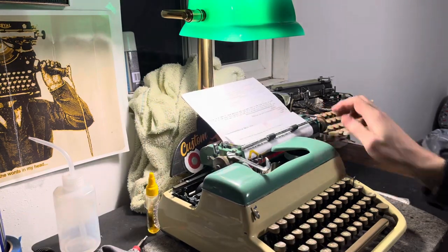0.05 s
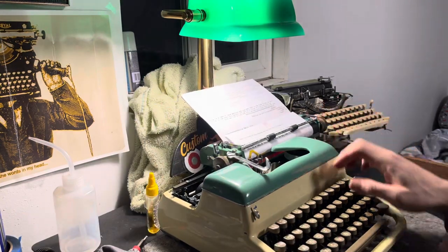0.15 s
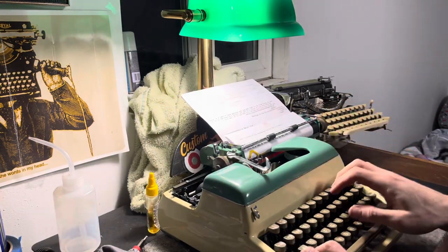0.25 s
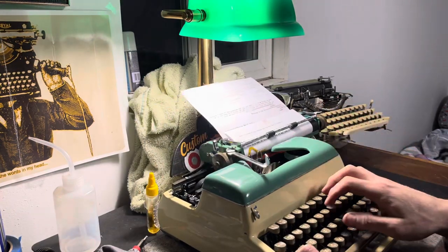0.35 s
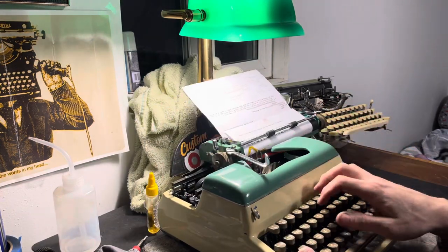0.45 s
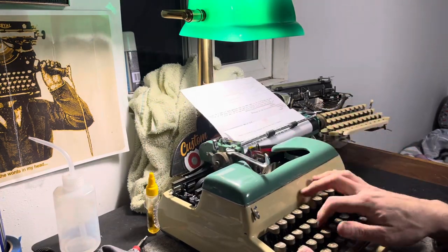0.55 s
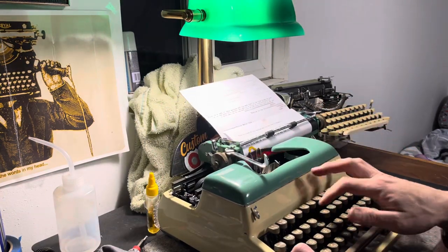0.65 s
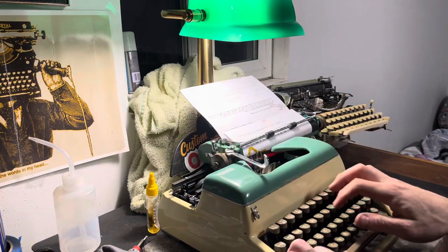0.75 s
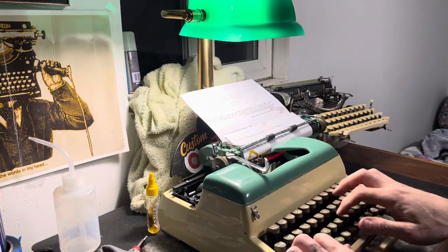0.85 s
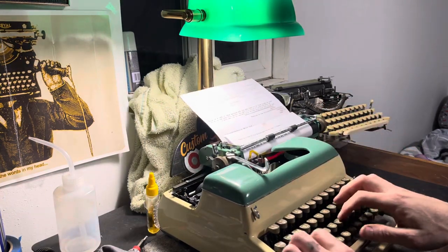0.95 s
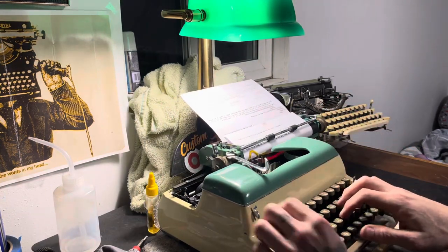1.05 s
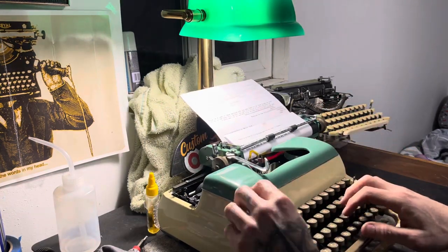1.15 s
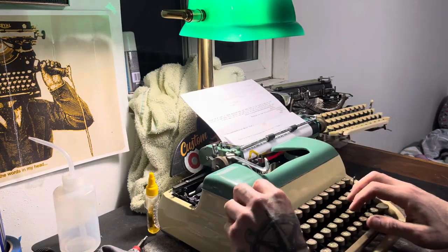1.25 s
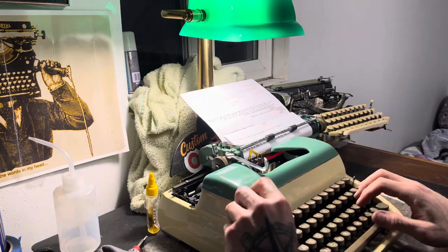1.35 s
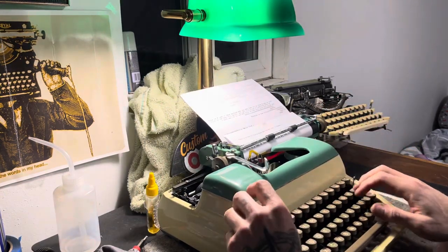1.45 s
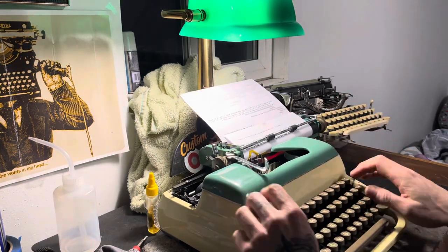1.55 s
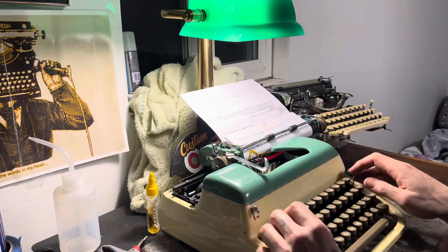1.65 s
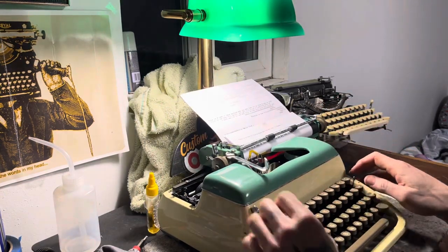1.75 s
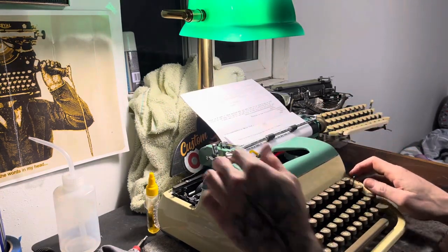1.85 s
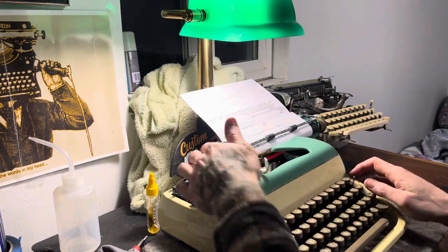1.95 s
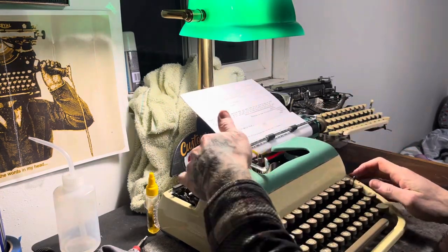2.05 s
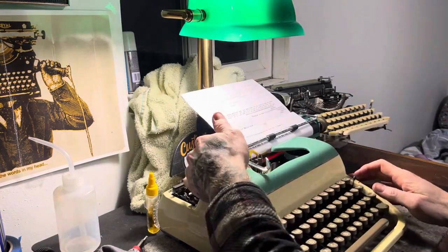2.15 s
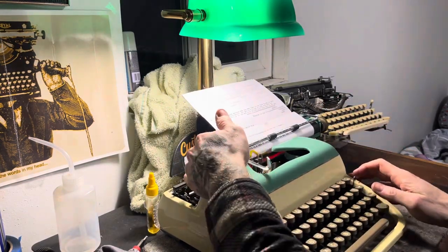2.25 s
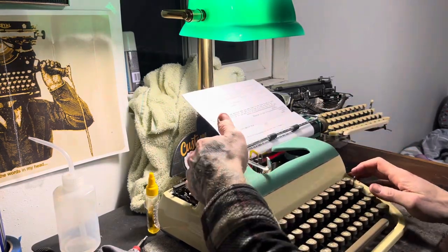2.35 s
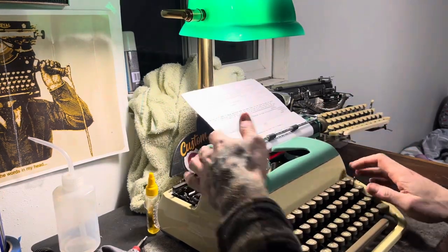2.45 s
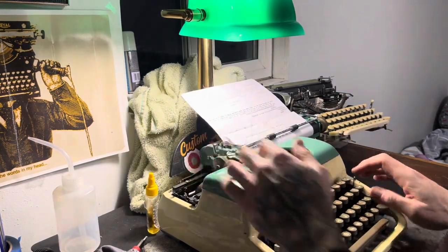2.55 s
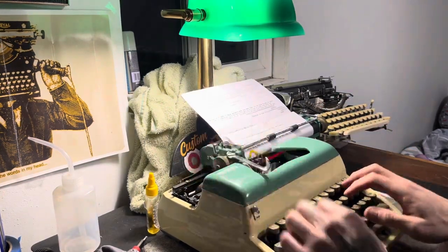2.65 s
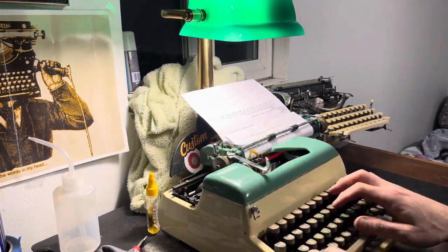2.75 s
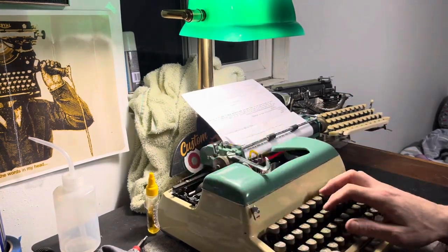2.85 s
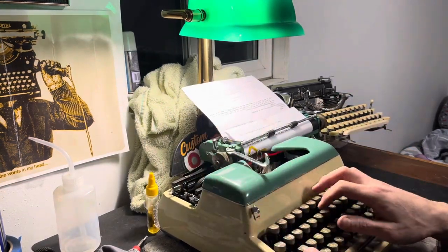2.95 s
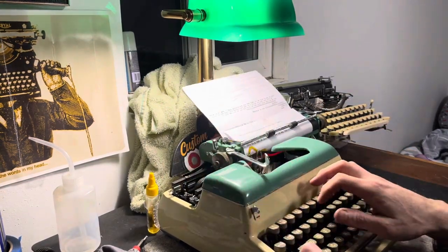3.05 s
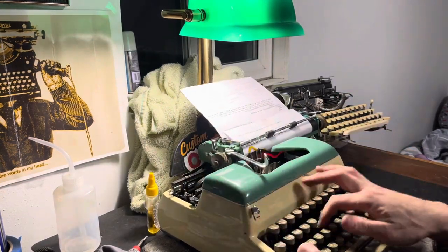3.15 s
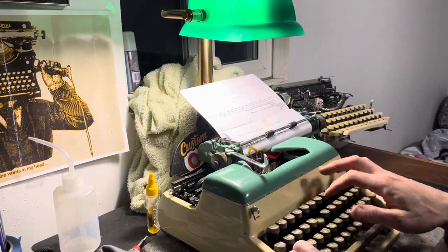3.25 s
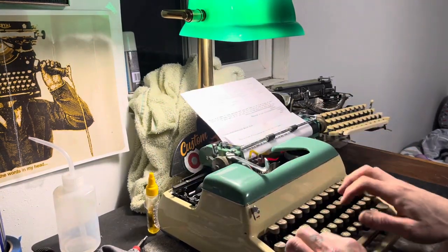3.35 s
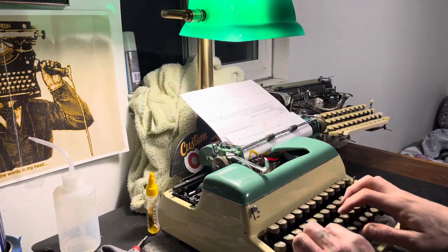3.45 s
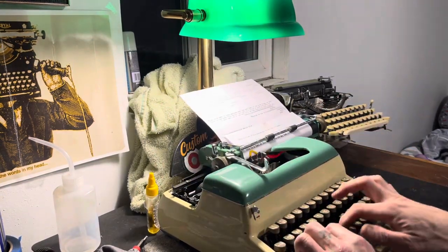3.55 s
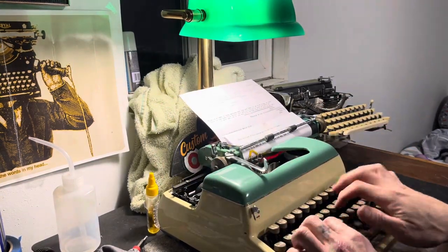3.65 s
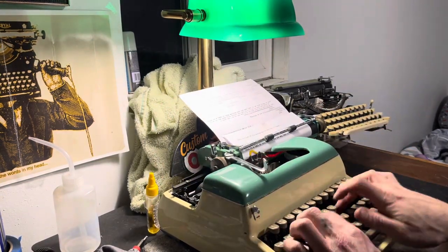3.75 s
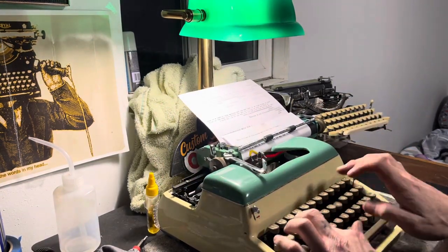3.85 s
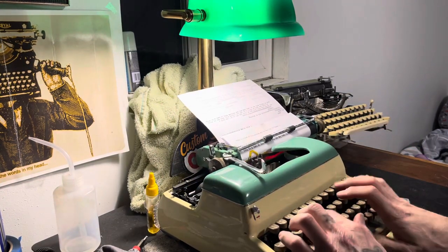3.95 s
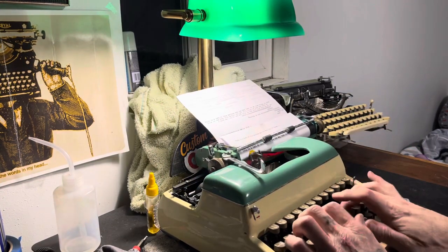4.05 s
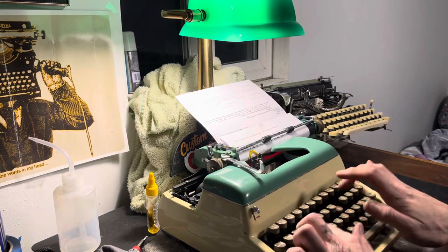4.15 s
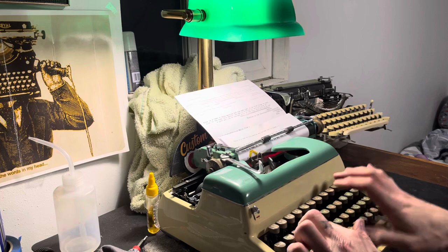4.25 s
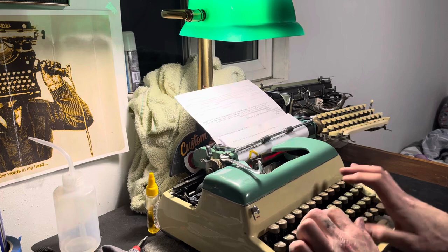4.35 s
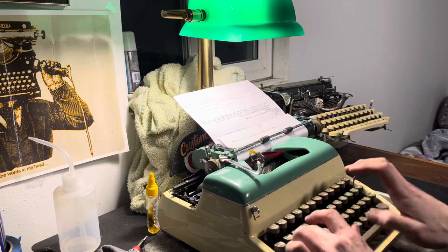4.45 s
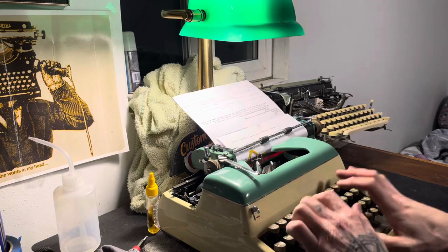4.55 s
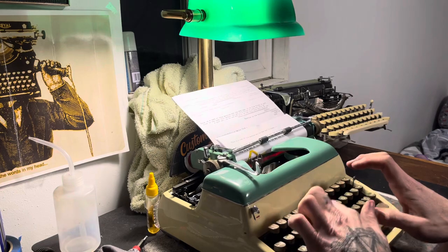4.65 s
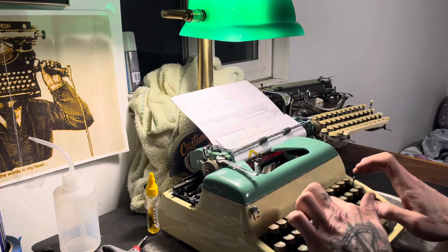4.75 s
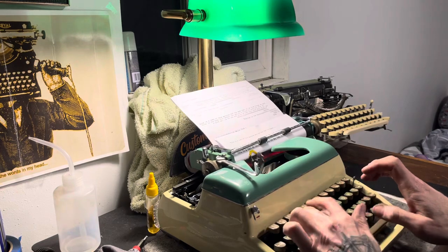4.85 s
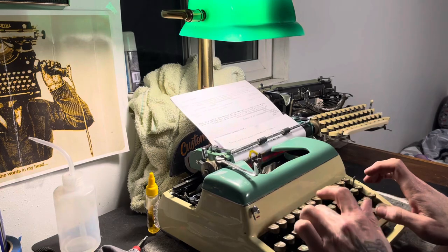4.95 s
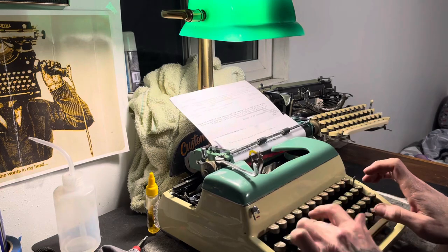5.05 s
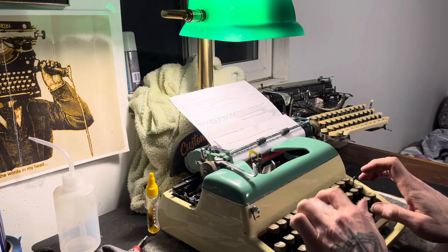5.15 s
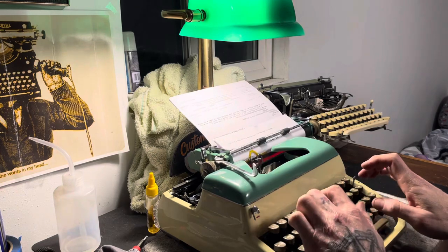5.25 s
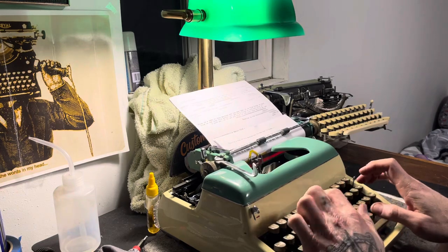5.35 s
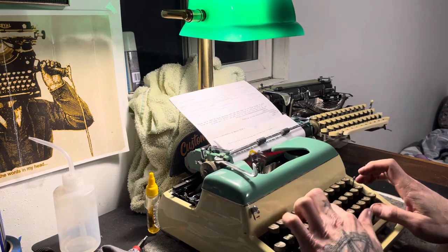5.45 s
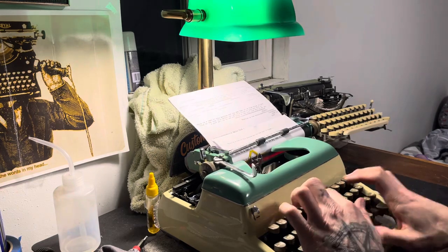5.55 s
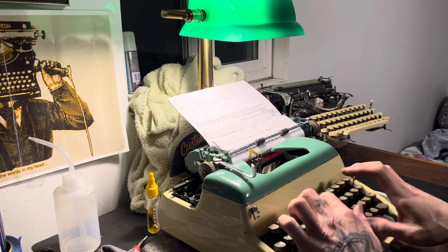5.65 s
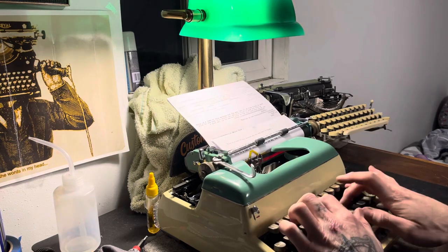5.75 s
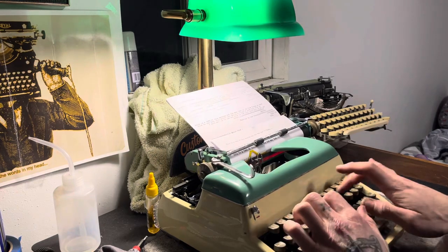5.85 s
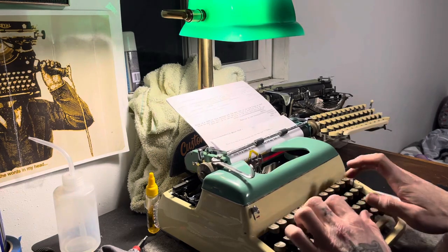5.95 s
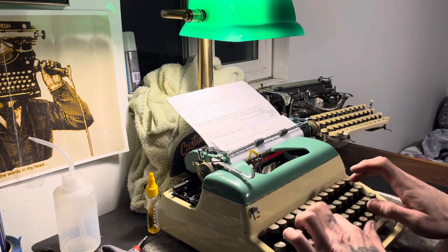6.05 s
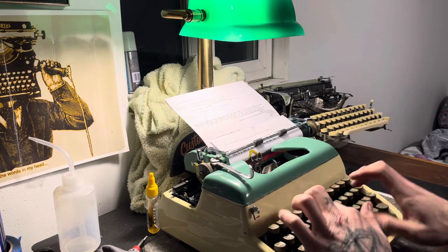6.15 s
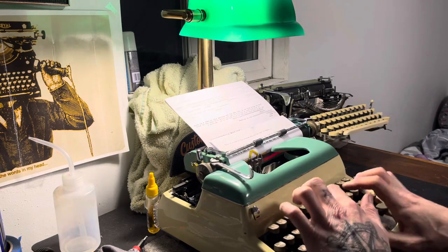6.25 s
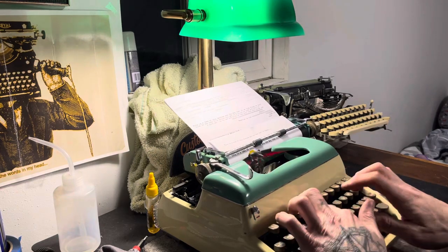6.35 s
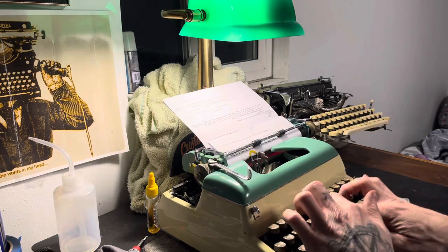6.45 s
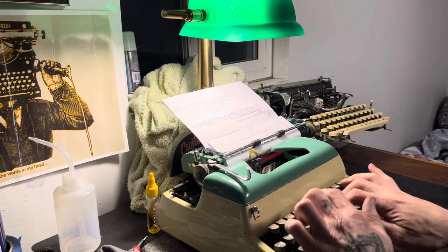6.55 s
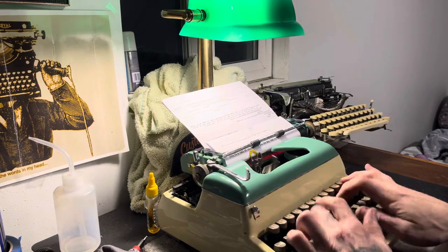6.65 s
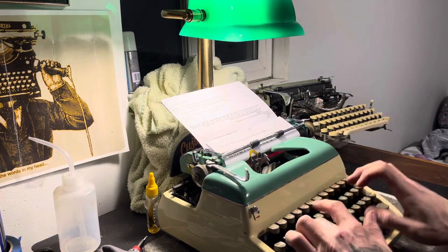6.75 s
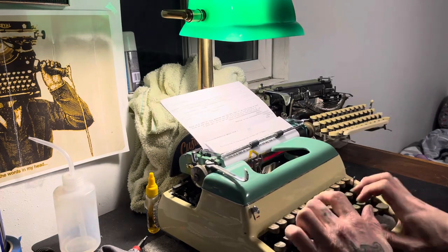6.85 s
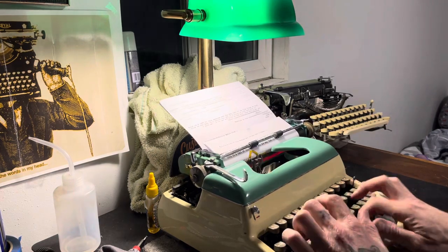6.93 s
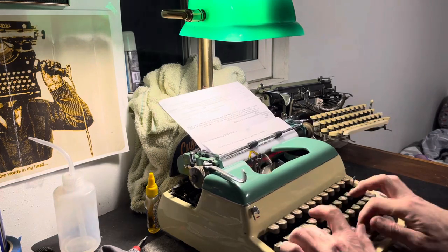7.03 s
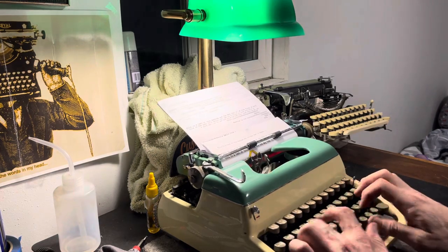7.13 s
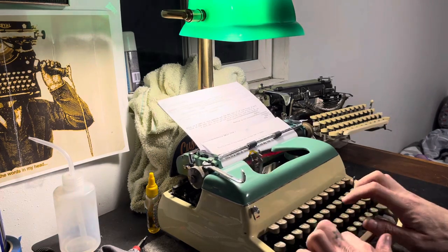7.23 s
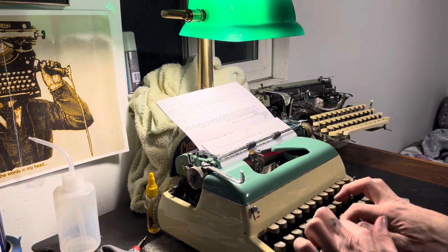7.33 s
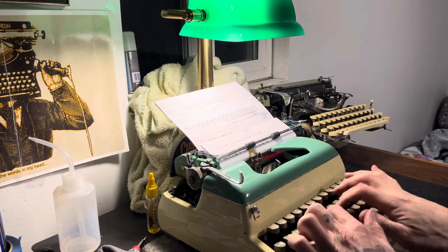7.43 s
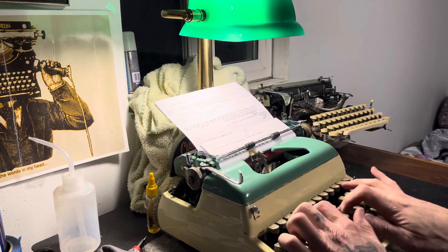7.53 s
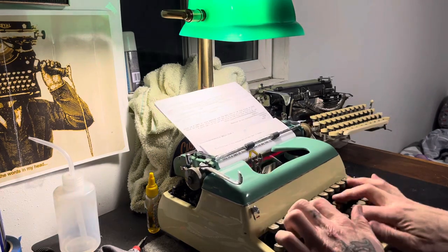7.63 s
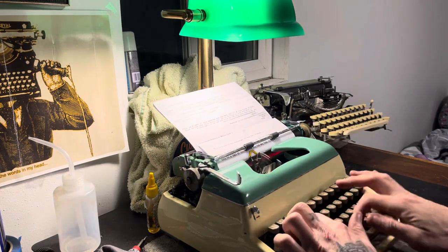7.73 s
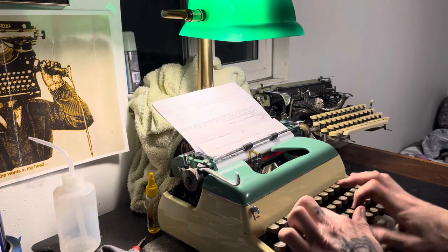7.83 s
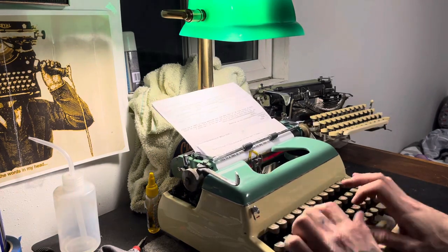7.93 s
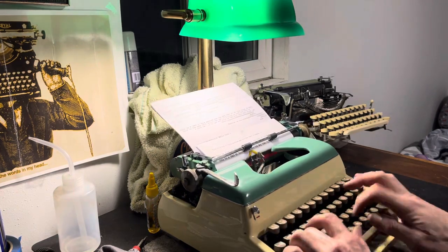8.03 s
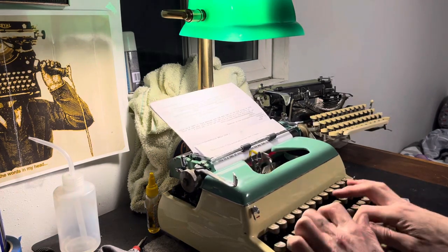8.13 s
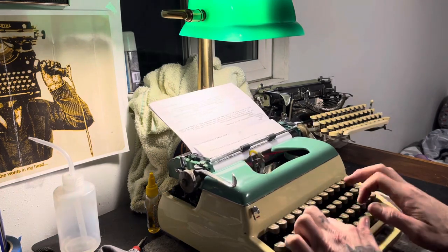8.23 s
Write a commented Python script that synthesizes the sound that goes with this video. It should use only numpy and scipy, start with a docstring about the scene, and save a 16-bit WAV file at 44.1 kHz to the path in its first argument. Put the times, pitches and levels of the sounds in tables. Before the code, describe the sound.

A manual typewriter heard close up: a few isolated hard key cracks with heavy shift clunks, a quiet carriage slide, then rapid continuous clattering typing.

```python
"""A manual typewriter on a wooden desk in a quiet room, heard close by on two channels.
Type slugs crack on the platen and ring it in bursts of noise and damped sines; each key drives
a rattling steel linkage of gritty scrapes and ticks, and shifting drops the heavy basket.
The case knocks and the desk booms in decaying low modes; once the carriage slides back, rustling.
Short noise tails reflect it all, over a faint room rumble of coloured noise."""
import sys
import numpy as np
from scipy import signal
from scipy.fft import rfft, irfft, next_fast_len
from scipy.io import wavfile
from scipy.ndimage import map_coordinates

SR = 44100
rng = np.random.default_rng(int(sys.argv[2]) if len(sys.argv) > 2 else 0)


def boost_factor(decibels):
    """Convert a level in decibels to a linear amplitude factor."""
    exponent = np.asarray(decibels, float) / 20
    return 10 ** exponent


def wav_record(signal):
    """Record a signal, one row per channel, as 16-bit PCM in the file named by sys.argv[1]."""
    frames = np.transpose(np.atleast_2d(signal))
    bounded = np.clip(frames, -1, 1)
    # unit amplitude maps onto the largest positive 16-bit level
    quanta = np.round(bounded * 32767).astype(np.int16)
    wavfile.write(sys.argv[1], SR, quanta)


N = 365588

# hard steel blows, type slugs on the platen (the second is a lever snapping):
# (time [s], level [dB], treble re blow [dB], slug ring [dB], lower ring [dB], case knock [dB])
STRIKES = [(0.569, -4.5, -12, -2, -8, -23), (1.3216, -14, -4, 0, 10, -28.5),
           (3.142, -6, -12.5, 1, -5, -20.5), (3.5474, -4, -19.5, 0, -3, -25), (3.727, -7.5, -4, -1, 0, -28),
           (3.835, -6.5, -14, 4.5, -8, -29.5), (4.0723, -11.5, -1, 0, 0, -28.5),
           (4.199, -10.5, -14.5, 1, 0, -25.5), (4.4475, -7.5, -10.5, 8.5, 4, -28.5),
           (4.709, -10, -1, -4.5, 2, -29.5), (4.8577, -6, -12, 7, 3, -27), (5.043, -7, -7, 3.5, 0, -33),
           (5.45, -10, -1, -6, -3, -30), (5.7818, -7, -17, -4, 0, -29.5), (6.0854, -8, 0.5, 8, -2, -27),
           (6.351, -9, -4, -3, -5, -30.5), (6.455, -5.5, -16, 0, 4, -27.5),
           (6.5966, -6.5, -14, 3, 2.5, -28), (6.707, -7, -12, 3, 2, -28),
           (7.001, -6.5, -14.5, -2.5, -1, -31.5), (7.0711, -9.5, -13.5, -6, -2, -35),
           (7.25, -8, -14, 2, -1.5, -32), (7.3535, -5, -16, -1, -4, -30),
           (7.5319, -11, -7.5, 9, 0.5, -30.5), (7.6714, -9, -15, 2, 0.5, -31),
           (7.768, -9, -17.5, 3, 0.5, -36), (8.023, -10.5, -9.5, 4, 0, -28.5),
           (8.1176, -8, -12.5, 1.5, -1, -27), (8.2416, -8.5, -16.5, -1, -0.5, -33.5)]
# broad colour of a slug on the platen: (frequency [Hz], relative density [dB per Hz])
CRACK = [(500, -19.5), (1300, -4), (2000, -3.5), (2900, 3), (4200, -5), (5200, -9.5), (6800, -7),
         (7500, -9.5), (17000, -57)]
# ring of the platen: (frequency [Hz], level [dB], 60 dB decay [s])
PLATEN = [(2090, -1.5, 0.015), (4050, -7.5, 0.0045), (4815, -8, 0.016), (6170, -2, 0.009),
          (7086, -0.5, 0.013), (11700, -10, 0.0065)]
# the colour of a blow drifts as the carriage moves along the platen:
# (time [s], slug ring [Hz], upper ring [dB], lower ring [dB])
CARRIAGE = [(0.5, 2535, -25, -19), (3.2, 2884, -25, -20), (4.7, 2815, -3.5, -32.5), (6.2, 2830, 0, -23),
            (6.7, 2750, -4.5, -8), (7.55, 2815, -47, -1), (7.67, 3030, -31, -5.5), (8.29, 2937, -33, 1)]
USUAL_TREBLE_DB, PLATEN_FOLLOWS, SLUG_FOLLOWS = -12.5, 0.36, -0.4  # bright: more platen, less slug
CRACK_T60_S, UPPER_SCATTER_DB = 0.02, -2
SLAP_S, SLAP_DB = 0.003, -7.5  # the slug touches twice
HANG_DB, HANG_T60_S = -21, 0.036  # and its ring hangs on faintly
SWELL_DB, SWELL_T60_S = -27, 0.069  # a faint noise swells just before each blow
UNEVEN_DB = 3.5


def strikes():
    """A crack of a few milliseconds; slug, platen and bars ring briefly near the same pitches each time."""
    s, db, treble_db, slug_db, low_db, _ = np.transpose(STRIKES)
    at, ring_hz, upper_db, lower_db = np.transpose(CARRIAGE)
    bright = treble_db - USUAL_TREBLE_DB

    touches = fades(s[:, None] + [0, SLAP_S], db[:, None] - 8.5 + [0, SLAP_DB], CRACK_T60_S, 0.00072)
    crack = touches * chatter(900, UNEVEN_DB) * noise(CRACK)
    hiss = fades(s, db + treble_db + 2.5, 0.02, 0.00089) * chatter(500, 2.1) * noise(SHEEN)

    hz, mode_db, fall = np.transpose(PLATEN)
    late, strength = rng.standard_normal((2, len(s), len(PLATEN)))
    platen_db = (db + PLATEN_FOLLOWS * bright)[:, None] - 12 + mode_db + 2.2 * strength
    platen = pings(s[:, None] + 0.0003 * abs(late), platen_db, hz, fall, 0.00021)

    upper_luck, lower_luck, slap_luck, hang_luck = rng.standard_normal((4, len(s)))
    slug_db = db - 6.5 + slug_db + SLUG_FOLLOWS * bright
    slug_hz = np.interp(s, at, ring_hz)
    slug = pings(s, slug_db, slug_hz, 0.01, 0.00049)
    slug += pings(s + SLAP_S, slug_db + SLAP_DB, slug_hz * (1 + 0.054 * slap_luck), 0.0096, 0.00087)
    hang = pings(s + SLAP_S, slug_db + HANG_DB, slug_hz * (1 + 0.02 * hang_luck), HANG_T60_S, 0.002)
    slug += hang * chatter(90, UNEVEN_DB)
    upper_db = db + np.interp(s, at, upper_db) + UPPER_SCATTER_DB * upper_luck
    slug += pings(s + 0.00041, upper_db, 4000, 0.0095, 0.0012)
    lower_db = db + np.interp(s, at, lower_db) + low_db + UPPER_SCATTER_DB * lower_luck
    slug += pings(s + 0.00029, lower_db, 1720, 0.0068, 0.00023)

    # bursts laid out backwards in time, so they grow up to the blow
    growing = fades(N / SR - s, db + SWELL_DB, SWELL_T60_S, 0.0004)[::-1]
    swell = growing * (noise(STEEL) + boost_factor(-16.5) * noise(SHEEN))
    return swell + crack + hiss + platen + slug + bars(s, db - 27.5, scatter_db=3.0)


# ring of type bars and platen: (frequency [Hz], level [dB], nominal 60 dB decay [s])
BARS = [(1847, -4.5, 0.16), (2092, 1, 0.088), (2360, -16.5, 0.041), (2830, -1.5, 0.041),
        (3030, -5.5, 0.015), (3620, -2, 0.064), (3960, -10.5, 0.1), (4560, -16.5, 0.12), (5200, -10.5, 0.2),
        (5340, -8, 0.14), (5940, -13.5, 0.2), (6140, -10, 0.056), (7330, -5.5, 0.14), (10620, -7, 0.02),
        (11600, -5.5, 0.018)]
LONGEST_RING_S = 0.13


def bars(times, db, scatter_db):
    """Every blow rings the type bars at new strengths and slightly new pitches."""
    hz, mode_db, t60 = np.transpose(BARS)
    strength, detune = rng.standard_normal((2, len(times), len(BARS)))
    level = db[:, None] + mode_db + scatter_db * strength
    return pings(times[:, None], level, hz * (1 + 0.0062 * detune), np.minimum(t60, LONGEST_RING_S), 0.00019)


# keys, bars and escapement meeting their stops:
# (time [s], level [dB], treble re contact [dB], nominal 60 dB decay [s], case knock [dB])
CONTACTS = [(0.3075, -54, -12, 0.17, -39), (0.3384, -43, -20, 0.91, -54), (.412, -37.5, 4.5, 0.16, -28.5),
            (0.5349, -21.5, -5, 0.17, -41), (0.682, -42.5, -3.5, 0.22, -53.5),
            (0.7133, -26.5, -9.5, 0.13, -30), (0.7286, -30, -23.5, 0.064, -48),
            (0.7708, -38, -21.5, .19, -50.5), (1.1957, -52, -9, 0.12, -60.5),
            (1.268, -46.5, 4.5, 0.042, -50.5), (1.302, -50.5, -10, 0.1, -53),
            (1.3137, -20, -1.5, 0.11, -33), (1.4421, -36, 1.5, 0.063, -45), (1.544, -51.5, -4, 0.16, -49.5),
            (1.598, -44, 0, 0.077, -47.5), (1.847, -74, -20, 0.34, -55), (1.89, -76, -20, 0.27, -57),
            (2.0086, -52.5, 14, 0.054, -53.5), (2.168, -47, -3, 0.053, -49), (2.188, -39.5, 0.5, 0.18, -40),
            (2.2095, -34, -4, 0.13, -39), (2.242, -44.5, -2, 0.095, -51), (2.423, -45, -11, 0.22, -42.5),
            (2.4475, -48, -0.5, 0.23, -47.5), (2.744, -71, -14, 0.092, -64), (2.879, -54.5, -1, 0.056, -76),
            (2.922, -44, -17, 1, -53), (2.983, -34.5, -12.5, 0.041, -27.5), (3.107, -24, -2, 0.16, -42),
            (3.1267, -27, -1, 0.31, -35.5), (3.254, -47, 4, 0.34, -53.5), (3.287, -26.5, -12.5, 0.2, -34.5),
            (3.508, -28.5, -4.5, 0.47, -38.5), (3.6578, -28, -6, .14, -45), (3.677, -33, -11, 0.16, -31.5),
            (3.695, -21, -7, 0.22, -30.5), (3.8207, -24, -5.5, 0.15, -38), (3.887, -35.5, -8, 0.25, -33.5),
            (3.9312, -27.5, -21.5, 0.078, -37), (3.9888, -35.5, -3, .17, -48),
            (4.0097, -27.5, -13.5, .1, -33.5), (4.0365, -24.5, -7, 0.34, -32.5),
            (4.179, -25, -4, 0.19, -38), (4.2832, -28.5, -15.5, 0.2, -39),
            (4.334, -20.5, -19, 0.037, -32.5), (4.391, -26.5, -10.5, 0.27, -31.5),
            (4.518, -29.5, -8.5, 0.092, -33), (4.6224, -28.5, -15.5, 0.51, -32),
            (4.672, -27, -0.5, 0.14, -33), (4.79, -27, -12.5, 0.213, -30.5),
            (4.824, -21.5, -4.5, 0.14, -30.5), (4.9916, -28, -11.5, 0.62, -32.5),
            (5.03, -38.5, -13, .1, -40.5), (5.141, -42, -12, 0.102, -41.5), (5.1597, -35, -8, 0.19, -52),
            (5.1975, -30, -9.5, .17, -58), (5.207, -23, -25, 0.047, -31), (5.2769, -40.5, -23, 0.087, -48),
            (5.4102, -28, -5, 0.56, -33.5), (5.562, -27.5, -14.5, 0.23, -38),
            (5.596, -25.5, -21, 0.05, -31), (5.681, -25.5, -17, 0.19, -32), (5.7392, -27, -5, 0.34, -45),
            (5.867, -41, 0.5, 0.25, -37.5), (5.904, -26, -9.5, 0.14, -28), (5.9858, -35, -24, 0.063, -46),
            (6.051, -27, -6, 0.52, -40), (6.197, -32, -10.5, 0.27, -39), (6.2339, -27, -4, 0.07, -30.5),
            (6.3071, -24.5, -5, 0.2, -30), (6.418, -26, -5.5, 0.22, -37), (6.559, -22.5, -2.5, 0.16, -34.5),
            (6.6732, -28.5, -5.5, 0.34, -39), (6.8092, -28.5, -17.5, 0.13, -34),
            (6.8488, -26.5, -11, 0.12, -33), (6.918, -23, -16, 0.21, -28), (6.9613, -30.5, -8.5, 0.63, -54),
            (7.05, -27, 0.5, 0.11, -32), (7.11, -29, -8.5, 0.22, -33.5), (7.18, -56, -15, 0.065, -43),
            (7.2329, -26, -5.5, 0.24, -41), (7.3195, -33, -5, 0.55, -40), (7.428, -29.5, -14, 0.048, -36.5),
            (7.493, -25, -7.5, 0.32, -40), (7.6, -40, -5.5, 0.3, -41.5), (7.641, -31, -5, .2, -51),
            (7.655, -26.5, -9, 0.36, -29.5), (7.7455, -29.5, -7.5, 0.39, -35),
            (7.8274, -31.5, -8.5, .12, -34.5), (7.873, -31, -9, 0.15, -38), (7.9, -24.5, -10.5, 0.076, -30),
            (7.975, -22.5, -12.5, 0.2, -29.5), (8.079, -41, 0, 0.16, -39), (8.1954, -30, -7, 0.4, -44),
            (8.224, -25.5, -6, 0.09, -31)]
# treble of steel contacts: (frequency [Hz], relative density [dB per Hz])
SHEEN = [(5000, -14), (7500, -6), (9500, -1.5), (12000, -7), (14000, -8), (15500, -20.5), (17000, -31)]
# each bar springs back off the platen
REBOUND_S, REBOUND_DB, REBOUND_TREBLE_DB, REBOUND_T60_S = 0.016, -21, -14.5, 0.25
RISE_S, RISE_PER_T60 = 0.0042, 0.0046  # a longer scrape also starts more slowly
SCRAPE_RING_DB = -6


def contacts():
    """A tick, then a gritty steel scrape that rings the type bars, one the loudest; the treble dies first."""
    rebounds = [(s + REBOUND_S, db + REBOUND_DB, REBOUND_TREBLE_DB, REBOUND_T60_S) for s, db, *_ in STRIKES]
    s, db, treble_db, t60 = np.transpose([row[:4] for row in CONTACTS] + rebounds)
    rise = np.clip(RISE_S + RISE_PER_T60 * t60, 0.0003, 0.03)
    grit = chatter(190, 3.33) * chatter(60, 1.2)
    scrape = fades(s, db - 6.0, t60, rise) * grit * steel(ring_db=SCRAPE_RING_DB, grain_db=-2.0)
    sheen = unit(noise(SHEEN) + boost_factor(6.0) * grains(SHEEN, 3000, cycles=89, size_db=2.5))
    scrape += fades(s, db + treble_db + 1.5, 0.62 * t60, rise) * grit * sheen
    tick = fades(s, db - 7.5, 0.012, 0.0011) * (noise(STEEL) + boost_factor(-5.5) * noise(SHEEN))
    # the loudest bar is drawn from the lower half of the table
    pick = (rng.random(len(s)) * len(BARS) / 2).astype(int)
    loudest = pings(s + 0.002, db - 10.0, np.transpose(BARS)[0][pick], 0.033, 0.0028)
    return scrape + tick + bars(s, db - 20.5, scatter_db=UNEVEN_DB) + loudest


# bright part of steel contacts: (frequency [Hz], relative density [dB per Hz])
STEEL = [(300, 1), (900, -2.5), (1500, -6.5), (2100, -3), (2900, -4), (4500, -4.5), (6500, -8.5),
         (7500, -13), (17000, -51)]
RING_WIDTH_HZ = 45


def steel(ring_db, grain_db):
    """Steel on steel: a broad scrape, tiny impacts, and the bars' resonances standing out."""
    modes = [(hz, RING_WIDTH_HZ + 3.1 / t60, db) for hz, db, t60 in BARS]
    scrape = noise(STEEL) + boost_factor(grain_db) * grains(STEEL, 3000, cycles=34, size_db=1.5)
    return unit(scrape + boost_factor(ring_db) * unit(rung(scrape, modes)))


# short pitched sounds, mostly clacks of small parts, a few low thuds of the frame:
# (time [s], level [dB], pitch [Hz])
SHORT_SOUNDS = [(.391, -26, 4000), (1.2194, -65, 3190), (1.254, -55, 2200), (1.271, -51, 4000),
                (1.302, -48, 2110), (1.323, -18, 860), (1.445, -35.5, 920), (1.553, -44, 2070),
                (1.602, -42.5, 2140), (2.009, -51, 1310), (2.0744, -65, 5940), (2.1044, -69, 5930),
                (2.1271, -50, 2970), (2.2082, -34.5, 2050), (2.216, -40, 1290), (2.383, -49, 2980),
                (2.4475, -38.5, 1900), (2.758, -64, 3000), (2.881, -51, 3400), (2.955, -24, 3930),
                (2.965, -27, 2000), (3.5179, -27, 2450), (3.884, -27, 800), (3.933, -30, 3480),
                (3.9944, -31, 3460), (4.012, -30, 3200), (4.214, -26.5, 890), (4.284, -27, 3500),
                (4.321, -27, 2500), (4.5438, -31, 5400), (4.5875, -48, 3200), (4.6384, -29, 2110),
                (4.796, -32, 750), (5.0, -31, 804), (5.6833, -32, 2040), (5.916, -29, 2070),
                (6.084, -30, 323), (6.238, -27, 1050), (6.318, -27, 5400), (6.452, -24, 223),
                (6.58, -30, 210), (6.693, -24, 630), (6.865, -27, 2960), (6.978, -33, 1880),
                (7.4754, -40, 1870), (7.748, -33, 3900), (7.826, -28, 900), (7.8936, -32, 2090),
                (7.902, -27.5, 840), (7.99, -27, 5400), (8.118, -28, 5200), (8.2064, -30, 4340)]
SHORT_T60_S, SHORT_GRIT_DB = 0.038, -8


def clacks_and_thuds():
    """Small parts clack and the frame thuds: a short damped sine at each pitch with a little grit."""
    s, db, hz = np.transpose(SHORT_SOUNDS)
    grit = fades(s, db + SHORT_GRIT_DB, SHORT_T60_S, 0.0006) * noise(STEEL)
    return pings(s, db - 6.0, hz, SHORT_T60_S, 0.0012) + grit


# the basket reaching its shift stops, softly going up, hard coming down:
# (time [s], clank [dB], wall thud [dB], case knock [dB], rise [s])
SHIFTS = [(0.376, -17.5, -16, -23, 0.007), (0.8184, -17, -3.5, -17, 0.0027),
          (2.952, -15, -15.5, -19.5, 0.01), (3.3495, -16.5, -2.5, -13, 0.0011)]
# case walls: (frequency [Hz], level [dB], 60 dB decay [s], lag [s])
WALLS = [(837, -11, 0.039, 0.0011), (314, -14.5, 0.097, .006), (196, -14.5, 0.09, .012),
         (141, -20, 0.062, .012), (504, -15, 0.036, 0.003)]
# the type basket's lingering ring: (frequency [Hz], level [dB])
BASKET = [(2051, -6.5), (2509, -8), (3101, -5), (3187, -7.5), (3967, -10.5), (4090, -10.5), (4613, -3.5),
          (5443, -2.5), (5766, -7.5), (6250, -13)]
BASKET_RING_DB, BASKET_T60_S, BASKET_WIDTH_HZ = -26, 0.3, 55
BOUNCE_S, BOUNCE_DB = 0.053, -14  # the basket bounces once


def shifts():
    """The basket cracks, clanks and shimmers on faintly; the walls thud, the landing again at the bounce."""
    s, db, wall_db, _, rise = np.transpose(SHIFTS)
    up = np.clip(rise, 0.0003, 0.03)
    blow = fades(s, db - 9.5, 0.18, up) + fades(s + 0.0011 + rise, db - 7.5, 0.045, up)
    metal = steel(ring_db=SCRAPE_RING_DB, grain_db=3.0) + boost_factor(-8.5) * noise(SHEEN)
    clank = blow * chatter(250, 0.96) * metal
    hz, mode_db, t60, lag = np.transpose(WALLS)
    thud = landing() + pings((s + rise)[:, None] + lag, wall_db[:, None] + mode_db, hz, t60, 0.0036)
    shaking = fades(s, db + BASKET_RING_DB, BASKET_T60_S, 0.0031) * chatter(90, 5) * rng.standard_normal(N)
    shimmer = rung(shaking, [(f, BASKET_WIDTH_HZ, g) for f, g in BASKET])
    return shimmer + clank + thud + bars(s + rise, db - 26.5, scatter_db=2.0)


# the basket's landing squeezes the case, a bright knock and then a deep one:
# (frequency [Hz], level [dB], lag [s], half length [s])
LANDING = [(587, -8, .0046, 0.003), (210, -9, 0.00987, 0.0047)]


def landing():
    """Each wall swings up and is stopped again within a few cycles; the bounce repeats it weakly."""
    s, _, wall_db, _, rise = np.transpose(SHIFTS)
    times = np.r_[s, s + BOUNCE_S] + np.r_[rise, rise]
    levels = np.r_[wall_db, wall_db + BOUNCE_DB]
    out, t = np.zeros(N + SR), np.arange(-SR // 40, SR // 40) / SR
    for hz, db, lag, half in LANDING:
        swing = np.exp(-(t / half) ** 2) * -np.cos(2 * np.pi * hz * t)
        for at, level in zip(times + lag, levels):
            out[round((at + t[0]) * SR):][:len(t)] += boost_factor(level + db) * swing
    return out[:N]


# hollow case: (frequency [Hz], width [Hz], level [dB])
CASE = [(524, 44, -13.5), (623.2, 28, -3), (852, 39.4, -5), (1286, 65, -10.5)]
# frame on its feet: (frequency [Hz], width [Hz], level [dB])
FRAME = [(134.3, 21, -5), (197.1, 13, -12), (246.3, 29, -2.5), (331.4, 36, -5)]
KNOCK_LAG_S, KNOCK_T60_S, UPPER_KNOCK_DB, KNOCK_SCATTER_DB = 0.00427, 0.049, -9.5, -4.5
SHAKE_PER_T60 = 0.13  # the case keeps shaking while a long scrape lasts
THUD_DB, THUD_FOLLOWS, THUD_T60_S, USUAL_KNOCK_DB = -31, 0.8, 0.092, -28
BASKET_FRAME_DB, BASKET_DAMPING = 4, 0.52  # shakes the frame harder than a key, shortens the knock


def knocks():
    """Every blow shakes the hollow case, rings its two strongest modes and thuds the frame on its feet."""
    basket = [(row[0] + row[4] + late, row[3] + loss, BASKET_FRAME_DB, BASKET_DAMPING)
              for row in SHIFTS for late, loss in [(0, 0), (BOUNCE_S, BOUNCE_DB)]]
    keys = [(row[0], row[-1], 0, 1) for row in STRIKES + CONTACTS]
    s, db, frame_db, damping = np.transpose(basket + keys)
    s, t60 = s + KNOCK_LAG_S, KNOCK_T60_S * damping
    low_pitch, upper_level, upper_pitch, thud_level, thud_pitch = rng.standard_normal((5, len(s)))
    scrape_s = np.r_[np.zeros(len(s) - len(CONTACTS)), np.transpose(CONTACTS)[3]]

    shake = fades(s, db - frame_db - 1.0, t60 + SHAKE_PER_T60 * scrape_s, 0.0021)
    case = rung(shake * rng.standard_normal(N), CASE)
    case += pings(s, db + 0.19, CASE[1][0] * (1 + 0.048 * low_pitch), t60, 0.002)
    upper_db = db - frame_db + UPPER_KNOCK_DB + KNOCK_SCATTER_DB * upper_level
    case += pings(s, upper_db, CASE[2][0] * (1 + 0.01 * upper_pitch), t60, 0.0011)
    thud_db = THUD_DB + THUD_FOLLOWS * (db - USUAL_KNOCK_DB) + frame_db + 2.0 * thud_level
    thud_hz = FRAME[1][0] * (1 + 0.056 * thud_pitch ** 2)
    return case + pings(s, thud_db, thud_hz, THUD_T60_S * damping, 0.0026)


# booms of the desk top: (time [s], low mode [dB], high mode [dB])
BOOMS = [(0.393, -17.5, -17.5), (0.412, -20, -18), (.638, -32, -28.5), (0.833, -22, -13.5),
         (2.204, -39, -30), (2.44, -37, -36.5), (2.693, -30, -49), (2.968, -20, -16), (2.988, -26, -15.5),
         (3.142, -31, -25), (3.364, -21, -13), (3.56, -38, -28), (3.732, -44, -28.5), (3.842, -24.5, -35),
         (3.962, -22, -35), (4.071, -36, -29), (4.173, -37, -31), (4.325, -24, -28), (4.531, -23.5, -27),
         (4.651, -32, -30), (4.721, -30, -26.5), (4.821, -27, -43), (4.929, -29, -46), (5.054, -43, -28.5),
         (5.152, -28, -49), (5.454, -43, -27), (5.599, -25, -26.5), (5.7, -47, -36), (5.799, -39, -35),
         (5.92, -34, -42), (6.09, -28, -31), (6.236, -36, -29.5), (6.33, -27, -28.5), (6.511, -41, -31.5),
         (6.615, -35, -32), (6.839, -25, -24.5), (6.935, -46, -29), (7.053, -40, -22.5), (7.28, -30, -26.5),
         (7.414, -41, -29), (7.522, -30, -28), (7.604, -48, -31.5), (7.817, -38, -28.5), (7.917, -27, -41),
         (8.041, -38, -26), (8.133, -37, -26.5)]
# the desk's two modes: (low centre [Hz], high centre [Hz])
DESK_HZ = (71, 87.6)
# their 60 dB decays: (low [s], high [s])
DESK_T60_S = (0.21, 0.25)


def booms():
    """Two modes of the desk top swing slowly up and ring out, a little off pitch each time."""
    s, low_db, high_db = np.transpose(BOOMS)
    hz = DESK_HZ * (1 + 0.022 * rng.standard_normal((len(s), 2)))
    low = pings(s, low_db, hz[:, 0], DESK_T60_S[0], 0.022)
    return low + pings(s, high_db, hz[:, 1], DESK_T60_S[1], 0.015)


# the carriage slides back: (time [s], rustle [dB])
RETURN = [(1.98, -82), (2.058, -85), (2.186, -75.5), (2.358, -78), (2.568, -80), (2.78, -101)]
# its long lever: (frequency [Hz], level [dB], nominal 60 dB decay [s])
LEVER = [(2680, -3, 0.12), (3700, -20, 0.13), (4700, -4, 0.3), (5281, -10, 0.26), (5560, 1, 0.12),
         (5630, -3.5, 0.28)]
LEVER_DB = -18.5


def carriage_return():
    """The carriage rustles along its rail, and every contact on the way rings the lever."""
    at, rustle_db = np.transpose(RETURN)
    gain = boost_factor(np.interp(np.arange(N) / SR, at, rustle_db, left=-120, right=-120))
    rustle = gain * chatter(78, 3.5) * (steel(ring_db=-7.5, grain_db=2.0) + noise(SHEEN))
    s, db = np.transpose([row[:2] for row in CONTACTS if at[0] < row[0] < at[-1]])
    hz, mode_db, t60 = np.transpose(LEVER)
    strength, detune = rng.standard_normal((2, len(s), len(hz)))
    level = db[:, None] + LEVER_DB + mode_db + 3 * strength
    lever = pings(s[:, None], level, hz * (1 + 0.0062 * detune), 0.93 * t60, 0.0012)
    return rustle + chatter(150, 5) * lever


CLATTERS_PER_S, CLATTER_DB, CLATTER_SCATTER_DB, CLATTER_T60_S = 40, -47, 3, 0.022
CLATTER_RING_DB = 1.5
USUAL_RATTLE_DB = -43
CASE_HUM_DB, CASE_FOLLOWS, FRAME_HUM_DB, FRAME_FOLLOWS = -57.5, 0.74, -50.5, 0.22


def linkage():
    """Levers rattle while the keys travel, loose parts click together, and the case and the frame hum."""
    moving = effort(USUAL_RATTLE_DB, 1.0)
    rattle = boost_factor(-10.0) * chatter(70, 5) * steel(ring_db=2.5, grain_db=7.5)
    rattle += boost_factor(-10.5) * chatter(120, UNEVEN_DB) * noise(SHEEN)

    when, size, part = rng.random((int(CLATTERS_PER_S * N / SR), 3)).T
    moving_db = 20 * np.log10(moving[(when * N).astype(int)] + 1e-9)
    db = CLATTER_DB + moving_db - USUAL_RATTLE_DB - CLATTER_SCATTER_DB * np.log(size)
    s = when * N / SR
    clatter = fades(s, db, CLATTER_T60_S, 0.0015) * steel(ring_db=1.5, grain_db=-2.0)
    clatter += pings(s, db + CLATTER_RING_DB, 900 + 5000 * part, 0.059, 0.0011)

    case_drive = effort(CASE_HUM_DB, CASE_FOLLOWS) * chatter(65, 5.0) * rng.standard_normal(N)
    frame_drive = effort(FRAME_HUM_DB, FRAME_FOLLOWS) * chatter(40, UNEVEN_DB) * rng.standard_normal(N)
    return moving * rattle + clatter + rung(case_drive, CASE) + rung(frame_drive, FRAME)


# moving linkage, one list for each span of motion: (time [s], rattle [dB])
EFFORT = [
    [(0.33, -69.5), (0.682, -48), (0.92, -65)],
    [(1.3, -68), (1.47, -68), (1.66, -76)],
    [(2.95, -63), (3.13, -81), (3.76, -43), (4.4, -44.5), (4.9, -38.5), (5.11, -55.5), (5.25, -74)],
    [(5.42, -57), (5.66, -53.5), (5.83, -45.5), (6.15, -74), (6.49, -39.5), (6.99, -48), (7.28, -51),
     (8.29, -47)],
]


def effort(level_db, follows):
    """Gain of a layer that follows part of the linkage's swings in level; still between the spans."""
    t, gain = np.arange(N) / SR, np.zeros(N)
    for rows in EFFORT:
        s, rattle_db = np.transpose(rows)
        swing_db = np.interp(t, s, rattle_db) - USUAL_RATTLE_DB
        gain += ((t > s[0]) & (t < s[-1])) * boost_factor(level_db + follows * swing_db)
    return gain


# decay of the surroundings: (frequency [Hz], 60 dB decay before shrinking [s])
ROOM = [(100, 0.36), (500, 0.26), (2000, 0.19), (8000, 0.12), (15000, 0.1)]


def reflections(x, shrink, delay):
    """Two answers of the surroundings, each frequency dying at its own speed, drawn anew every 0.15 s."""
    out, hop = np.zeros((2, N + SR)), round(0.15 * SR)
    for start in range(0, N, hop):
        hz, t, z = signal.stft(rng.standard_normal((2, SR // 3)), SR, nperseg=128)
        t60 = shrink * along(ROOM, hz)[:, None]
        tail = signal.istft(z * boost_factor(-60 * t / t60), SR, nperseg=128)[1]
        wet = signal.fftconvolve(x[None, start:start + hop], tail / np.linalg.norm(tail[0]), axes=1)
        out[:, start + round(delay * SR):][:, :wet.shape[1]] += wet
    return out[:, :N]


# room tone: (frequency [Hz], relative density [dB per Hz])
AIR = [(12, -54), (20, -25), (43, -5), (65, -3), (116, -20.5), (163, -31.5), (182, -22.5), (277, -16.5),
       (301, -30.5), (678, -36), (738, -35.5), (873, -38), (1120, -37), (1710, -44.5), (16000, -93.5)]
AIR_DB, HISS_DB = -49.5, -90


def room_tone():
    """A faint, slowly wavering low rumble and a steady trace of hiss, both coloured noise."""
    rumble = boost_factor(AIR_DB) * chatter(5, 0.6) * spread(noise(AIR), noise(AIR))
    return rumble + boost_factor(HISS_DB) * spread(noise(SHEEN), noise(SHEEN))


# likeness of the two sides: (frequency [Hz], left-right correlation [0 to 1])
ALIKE = [(60, .9995), (150, .995), (220, .98), (300, .93), (700, .93), (1400, .6), (3000, .8), (6000, .66),
         (7600, .93), (8400, .98), (9200, .93), (12000, .86), (15000, .8)]


def spread(x, other):
    """Left and right from a shared and an unshared part."""
    turn = lambda hz: np.arccos(np.clip(along(ALIKE, hz), 0, 1)) / 2
    own = filtered(other, lambda hz: np.sin(turn(hz)))
    return filtered(x, lambda hz: np.cos(turn(hz))) + [own, -own]


def pings(times, db, hz, t60, rise):
    """Damped sines, one for each entry."""
    out = np.zeros(N + SR)
    for s, level, pitch, fall in np.broadcast(times, db, hz, np.clip(t60, 0.005, 0.6)):
        t = np.arange(round(fall * SR)) / SR
        envelope = boost_factor(level - 60 * t / fall) * (1 - np.exp(-t / rise))
        out[round(s * SR):][:len(t)] += envelope * np.sin(2 * np.pi * pitch * t)
    return out[:N]


def fades(times, db, t60, rise):
    """Envelope of bursts that rise, then die; their powers add."""
    power = np.zeros(N + SR)
    for s, level, fall, up in np.broadcast(times, db, np.clip(t60, 0.005, 0.5), rise):
        t = np.arange(round(fall * SR)) / SR
        power[round(s * SR):][:len(t)] += (boost_factor(level - 60 * t / fall) * (1 - np.exp(-t / up))) ** 2
    return np.sqrt(power[:N])


def chatter(rate, depth_db):
    """Uneven gain that wavers at random about rate times a second."""
    points = rng.standard_normal(int(N * rate / SR) + 4)
    return unit(boost_factor(depth_db * map_coordinates(points, [np.arange(N) * rate / SR])))


def grains(spectrum, rate, cycles, size_db):
    """Tiny impacts of loose parts, each ringing a few cycles at its own pitch, coloured by a spectrum."""
    when, pitch, size = rng.random((3, int(rate * N / SR), 1))
    hz, k = 900 + 14500 * pitch, np.arange(160)  # k counts samples
    decay_db = 60 * k / SR * (hz + 3000) / cycles
    wave = boost_factor(-size_db * np.log(size) - decay_db) * np.sin(2 * np.pi * hz * k / SR)
    summed = np.bincount(((when * N).astype(int) + k).ravel(), wave.ravel(), N + len(k))[:N]
    return unit(filtered(summed, lambda f: boost_factor(along(spectrum, f))))


def noise(spectrum):
    """Coloured noise of rms 1."""
    return unit(filtered(rng.standard_normal(N), lambda hz: boost_factor(along(spectrum, hz))))


def rung(x, modes):
    """x through (Hz, width Hz, dB) resonances, scaled so that white noise keeps its rms."""
    def response(f):
        r = 0
        for k, (centre, width, db) in enumerate(modes):
            # neighbouring modes have opposite signs
            r = r + (-1) ** k * boost_factor(db) * 1j * f * width / (centre * centre - f * f + 1j * f * width)
        return r / np.sqrt(np.mean(abs(r) ** 2))
    return filtered(x, response)


def filtered(x, response):
    """x times a complex response of frequency."""
    m = next_fast_len(N + SR // 2)
    return irfft(rfft(x, m) * response(np.fft.rfftfreq(m, 1 / SR)), m)[..., :N]


def along(points, hz):
    """Reads (Hz, value) points on a log frequency axis."""
    f, v = np.transpose(points)
    return np.interp(np.log(hz + 1), np.log(f + 1), v)


def unit(x):
    """x scaled to rms 1."""
    return x / np.sqrt(np.mean(x ** 2) + 1e-20)


def scene():
    """The machine with its reflections, spread left and right over the room tone."""
    machine = strikes() + contacts() + clacks_and_thuds() + shifts() + knocks() + booms()
    machine += carriage_return() + linkage()
    wet = reflections(machine, shrink=0.96, delay=0.005)
    desk_top = reflections(machine, shrink=0.091, delay=0)[0]
    shared = machine + boost_factor(-12.0) * wet[0]
    unshared = desk_top + boost_factor(-6.0) * wet[1]
    return spread(shared, unshared) + room_tone()


def roll_off(x):
    """The treble ends steeply here."""
    return signal.sosfilt(signal.butter(12, 16640, fs=SR, output="sos"), x)


# phase between the ports: (frequency [Hz], left port's lead [rad])
LEAD = [(60, 0), (1000, -.2), (1550, 1), (1900, 0), (2840, .75), (4200, .4), (6900, -1.6), (7800, -3),
        (9100, -3.3), (10000, -4.6), (11300, -6.1), (13000, -6.5), (14000, -8), (15000, -9.4)]
# balance between the ports: (frequency [Hz], left over right [dB])
TIP = [(250, 1), (700, -1), (2400, 1), (4400, 5), (7500, -0.5), (12000, 0)]


def record(dry):
    """The two ports hear the machine with a phase lead and a balance that change with frequency."""
    # half of the lead and balance goes to the left, the inverse to the right
    half = lambda hz: boost_factor(along(TIP, hz) / 2) * np.exp(0.5j * along(LEAD, hz))
    ports = filtered(dry, lambda hz: np.array([half(hz), 1 / half(hz)]))
    return roll_off(ports)


dry = scene()
out = record(dry)
wav_record(out)
```